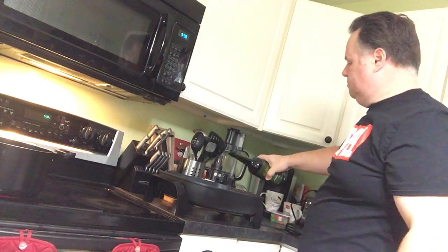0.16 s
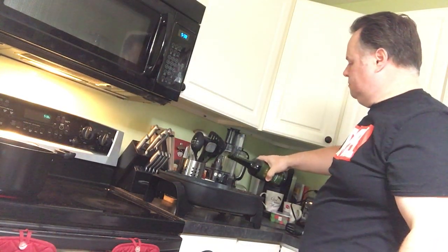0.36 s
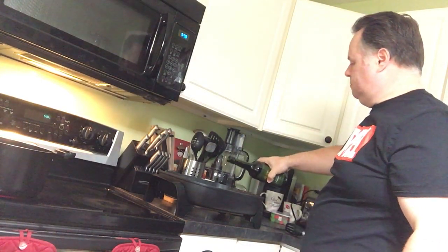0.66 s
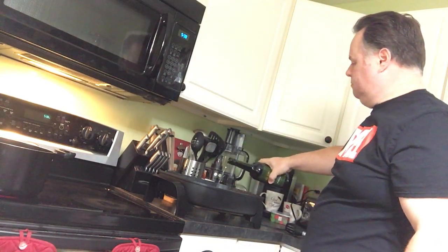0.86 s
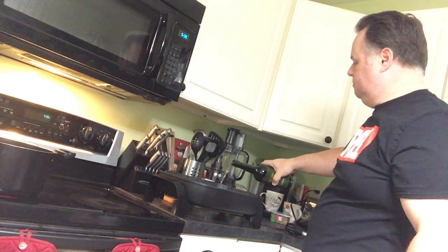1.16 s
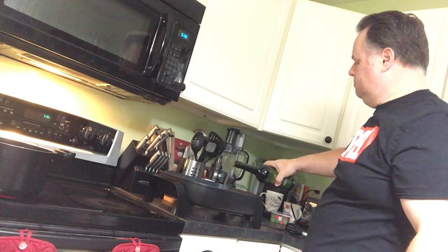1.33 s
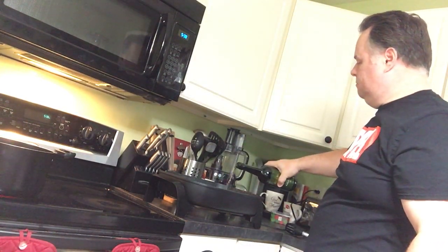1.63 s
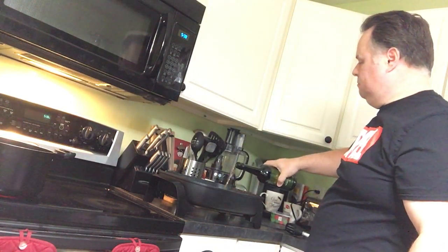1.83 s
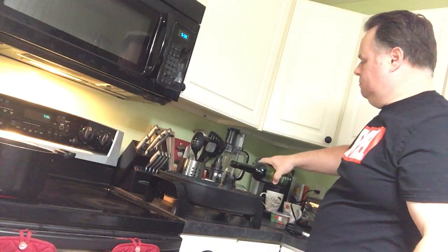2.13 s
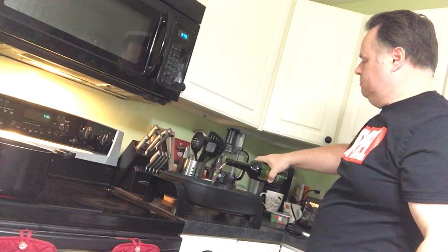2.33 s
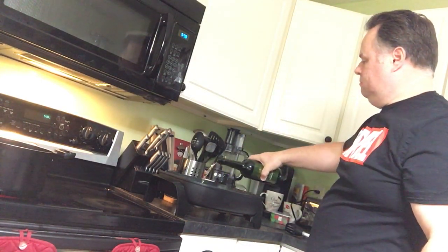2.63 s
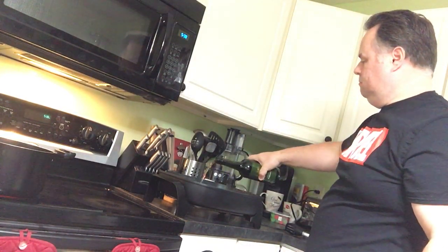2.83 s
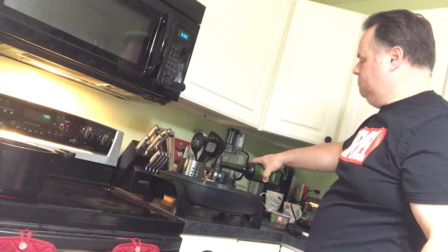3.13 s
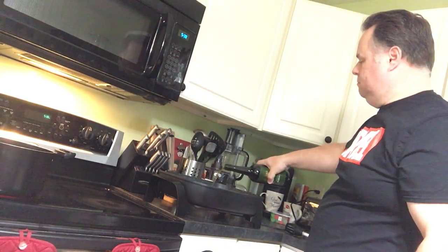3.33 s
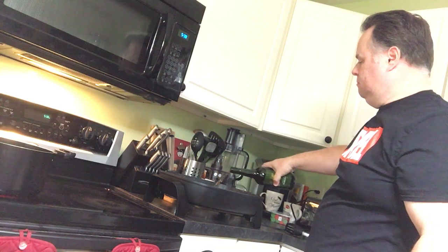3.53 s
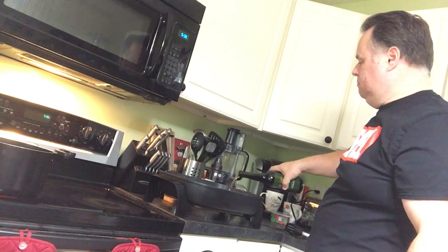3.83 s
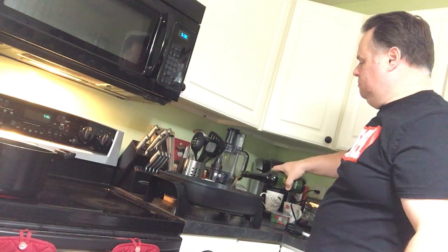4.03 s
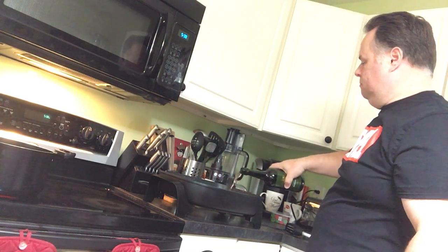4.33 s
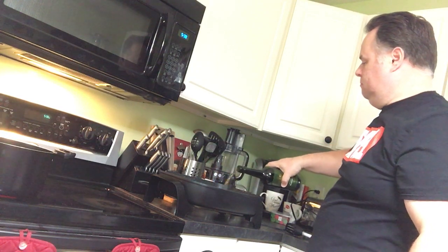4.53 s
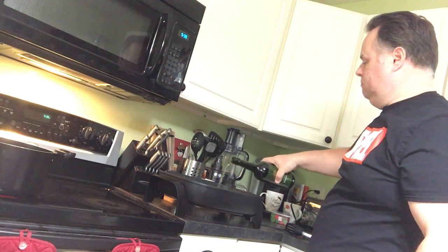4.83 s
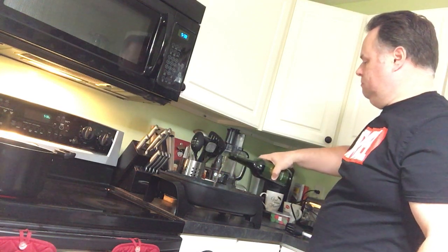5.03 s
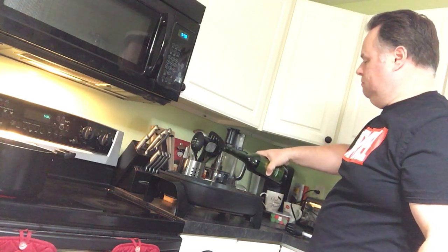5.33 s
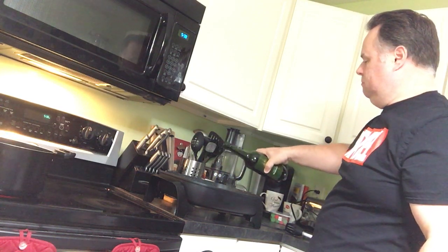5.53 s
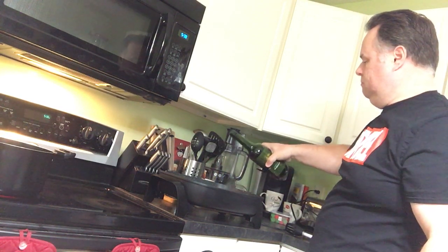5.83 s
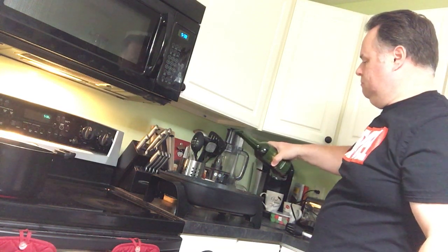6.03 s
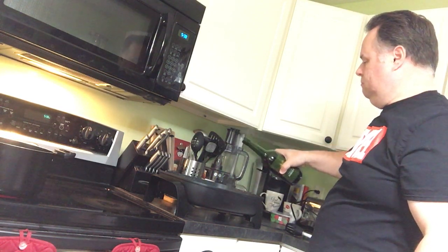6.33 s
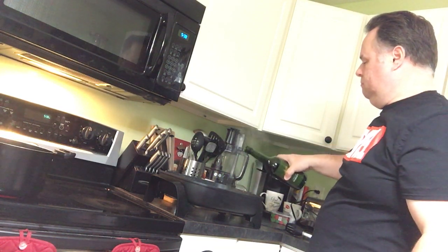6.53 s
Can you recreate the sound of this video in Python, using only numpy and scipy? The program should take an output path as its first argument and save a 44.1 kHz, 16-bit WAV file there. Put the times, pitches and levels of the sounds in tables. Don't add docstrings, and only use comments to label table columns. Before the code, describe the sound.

Close over a stove: faint fan rush first, with tiny ticks of drops on hot metal and hollow glassy gulps from a pouring bottle. Thin puddles burst in short pitched sprays, then merge into strong sizzling with bright fat spits. As the pool deepens the sizzle grows wetter and hollower, ringing in the iron, and continues unbroken. Small domestic kitchen, one nearby microphone.

```python
import sys
import numpy as np
from scipy import signal
from scipy.fft import rfft, irfft, next_fast_len
from scipy.io import wavfile

SR = 44100
rng = np.random.default_rng(int(sys.argv[2]) if len(sys.argv) > 2 else 0)


def ratio_of_db(decibels):
    return 10 ** (np.asarray(decibels, float) / 20)


def store_pcm(level_fs):
    pcm = np.round(np.clip(level_fs, -1, 1) * 32767).astype(np.int16)
    wavfile.write(sys.argv[1], SR, np.atleast_2d(pcm).T)


N = 294147


def rms_one(x):
    return x / np.sqrt(np.mean(x ** 2) + 1e-20)


def in_time(rows):
    start_s, *columns = np.transpose(rows)
    return [np.interp(np.arange(N) / SR, start_s, column) for column in columns]


def at_hz(points, hz):
    pitch_hz, level_db = np.transpose(points)
    return np.interp(np.log(hz), np.log(pitch_hz), level_db)


def drift(per_s):
    r = np.exp(-80 * np.pi * per_s / SR)
    noise = rng.standard_normal(N // 40 + 2002)
    slow = signal.lfilter([1], [1, -2 * r, r * r], noise)[2000:]
    return np.interp(np.arange(N) / 40, np.arange(len(slow)), rms_one(slow))


def ring(clicks, hz, t60_s):
    r = ratio_of_db(-60 / (t60_s * SR))
    w = 2 * np.pi * hz / SR
    return signal.lfilter([1, 0, -1], [1, -2 * r * np.cos(w), r * r], clicks + 1e-18)


def band(x, low_hz, high_hz, order=2):
    return signal.sosfilt(signal.butter(order, [low_hz, high_hz], "band", fs=SR, output="sos"), x)


def resonate(x, modes):
    hz, width_hz, level_db = np.transpose(modes)
    g = ratio_of_db(level_db / 2)
    c = -2 * np.cos(2 * np.pi * hz / SR)
    a = np.tan(np.pi * width_hz / SR)
    sos = np.transpose([1 + a * g, c, 1 - a * g, 1 + a / g, c, 1 - a / g]) / (1 + a / g)[:, None]
    return signal.sosfilt(np.ascontiguousarray(sos), x)


def bursts(rows, octaves, trim_db, rise=9.0):
    out = np.zeros(N + SR)
    t = np.arange(int(.1 * SR)) / SR
    shape = (len(rows), len(t))
    pops = rng.standard_normal(shape) * (rng.random(shape) < .3)
    for (start_s, level_db, hz, length_s), spray in zip(rows, pops):
        high_hz = min(hz * 2 ** octaves, .45 * SR)
        spray = rms_one(band(spray, hz / 2 ** octaves, high_hz, order=1))
        age = t / np.clip(length_s, .001, .04)
        envelope = (1 - np.exp(-rise * age)) * np.exp(-age)
        at = round((start_s - .001) * SR)
        out[at:at + len(t)] += ratio_of_db(level_db + trim_db) * envelope * spray
    return out[:N]


# start_s [s], level_db [dB peak], pitch_hz [Hz]
HOUSING_SHUDDERS = [
    (0.014, -58, 251),
    (0.064, -62, 232),
    (0.106, -51, 248.5),
    (0.161, -59, 277),
    (0.226, -60, 245),
    (0.294, -62, 299),
]


def shudders():
    t = np.arange(SR) / SR
    rocks = 0
    for start_s, level_db, hz in HOUSING_SHUDDERS:
        swell = 1 / np.cosh((t - start_s - .008) / 0.0092)
        rocks = rocks + ratio_of_db(level_db - 5) * np.sin(2 * np.pi * hz * t) * swell
    return np.pad(rocks, (0, N - SR))


# pitch_hz [Hz], level_db [dB per Hz]
FAN_AIR = [(15, -51), (25, -19.5), (86, -13), (144, -21), (165, -3.5), (247, -8), (291, 1), (324, -6.5),
           (472, -21), (526, -15.5), (635, -24), (788, -22.5), (1590, -26), (6110, -27.5), (15700, -42)]
HOUSING_HUM_DB = (-69.5, -63)


def fan():
    run_in = 8000
    white = rng.standard_normal((4, N + run_in))
    edges_hz = 22 * 2 ** np.arange(0, 9.7, 1 / 3)
    air = 0
    for k, (low_hz, high_hz) in enumerate(zip(edges_hz, edges_hz[1:])):
        hz = np.sqrt(low_hz * high_hz)
        hummed_db = -8.5 if 150 < hz < 330 else 0
        air = air + ratio_of_db(at_hz(FAN_AIR, hz) + hummed_db) * band(white[k % 2], low_hz, high_hz)
    air = resonate(air, [(385, 330, -5.0), (1680, 140, 4.5)])[run_in:]
    lower_db, upper_db = (db - 0.5 * drift(9.7) for db in HOUSING_HUM_DB)
    lower = rms_one(band(white[2], 171, 195)[run_in:])
    upper = rms_one(band(white[3], 222, 295)[run_in:])
    hum = ratio_of_db(lower_db - 3) * lower + ratio_of_db(upper_db - 4) * upper
    return shudders() + ratio_of_db(-61.5) * rms_one(air) + hum


def kitchen(x):
    size = next_fast_len(N + SR)
    hz = np.arange(size // 2 + 1) * SR / size
    t60_s = 1 / (1 + hz / 5000)
    walls = 0
    for k, lag_s in enumerate(np.geomspace(.0121, .0389, 10)):
        once = ratio_of_db(-60 * lag_s / t60_s) * np.exp(-2j * np.pi * hz * lag_s)
        walls = walls + (-1) ** k * once / (1 - once)
    return irfft(rfft(x, size) * walls, size)[:N]


def blip(rows, cycles, rise, trim_db):
    out = np.zeros(N)
    for start_s, level_db, hz in rows:
        half = int(15 * SR / hz)
        turns = np.arange(-half, half) * hz / SR
        at = round((start_s + 0.00256) * SR) - len(turns) // 2
        swell = 1 / np.cosh(turns / cycles)
        tone = np.sin(2 * np.pi * turns * (1 + rise * turns))
        out[at:at + len(turns)] += ratio_of_db(level_db + trim_db) * swell * tone
    return out


# start_s [s], level_db [dB peak], pitch_hz [Hz]
LIP_DROPS = [
    (0.3272, -54, 2670),
    (0.7243, -51, 2940),
]


def lip_drops():
    return blip(LIP_DROPS, cycles=7.3, rise=.001, trim_db=-8)


# start_s [s], level_db [dB peak], pitch_hz [Hz]
NECK_GLUGS = [
    (.331, -52.5, 1045),
    (.5345, -58, 1080),
    (.730, -59, 1060),
    (.924, -53.5, 1095),
    (1.129, -53, 1120),
    (1.343, -48, 1120),
]


def neck_glugs():
    return blip(NECK_GLUGS, cycles=1.45, rise=0.0051, trim_db=1.5)


def glass(neck):
    far_wall_s, far_wall_db = 0.0363, 1
    echoed = neck + ratio_of_db(far_wall_db) * np.roll(neck, round(far_wall_s * SR))
    main = ratio_of_db(-52.5) * ring(echoed, 1039, 0.45)
    lower = ratio_of_db(-56) * ring(neck, 995, 0.43)
    upper = ratio_of_db(-47) * ring(neck, 1105, 0.13)
    return main + lower + upper


# start_s [s], level_db [dB peak], pitch_hz [Hz], length_s [s]
LONE_SPITS = [
    (.030, -47, 7500, 0.012),
    (.42, -55, 3300, .012),
    (.44, -55, 1700, 0.035),
    (.459, -51, 10000, .004),
    (.620, -48, 4000, .007),
]


def lone_spits():
    return bursts(LONE_SPITS, octaves=0.18, trim_db=-9.0)


# start_s [s], level_db [dB peak]
FAT_SPITS = [(0.7978, -49), (0.8372, -49), (1.0343, -43), (1.1535, -43), (1.2164, -47), (1.3172, -44),
             (1.3601, -41), (1.4713, -46), (1.5501, -49), (1.603, -45), (1.8026, -45), (1.8694, -41),
             (1.9846, -40), (2.0625, -42), (2.1084, -41), (2.2525, -41), (2.3403, -41), (2.3832, -44),
             (2.4875, -43), (2.5254, -42), (2.6167, -34), (2.6541, -38), (2.7863, -37), (2.8272, -39),
             (2.8606, -37), (2.9679, -45), (3.0003, -41), (3.0527, -42), (3.1774, -41), (3.2238, -38),
             (3.2862, -32), (3.3969, -36), (3.4638, -35), (3.585, -37), (3.7436, -41), (4.0465, -38),
             (4.1562, -40), (4.46, -39), (4.5074, -38), (4.6032, -32), (4.8616, -40), (4.9908, -40),
             (5.0562, -43), (5.1789, -42), (5.2223, -44), (5.4538, -41), (5.6139, -42), (5.8334, -43),
             (5.9761, -41), (6.4729, -45), (6.5747, -41)]
# start_s [s], level_db [dB peak]
FAT_CRACKS = [
    (1.030, -40),
    (1.372, -40),
    (2.653, -31),
    (2.8605, -36),
    (3.46, -35),
    (3.598, -35),
    (4.862, -36),
    (5.456, -36),
]


def fat():
    small = [(start_s, level_db, 10500, 0.0091) for start_s, level_db in FAT_SPITS]
    big = [(start_s, level_db, 9500, .009) for start_s, level_db in FAT_CRACKS]
    return bursts(small, octaves=0.5, trim_db=-9.0, rise=4.6) + bursts(big, octaves=0.58, trim_db=-8)


# start_s [s], level_db [dB peak], pitch_hz [Hz]
FIRST_PUDDLES = [(0.788, -53.0, 4600), (0.794, -58, 5250), (0.802, -57, 5990), (0.854, -46.5, 2020),
                 (0.864, -47, 6930), (0.907, -45, 4010), (0.908, -45, 6030), (0.944, -46, 6120),
                 (0.946, -49, 3960), (0.955, -42, 2350), (0.962, -44, 2980), (0.988, -40, 2580),
                 (1.014, -40.5, 5210), (1.099, -45, 2000), (1.107, -46.0, 4310), (1.109, -39, 2840),
                 (1.135, -40.5, 2700), (1.151, -40.0, 2840), (1.172, -39, 2900), (1.185, -44.0, 3880),
                 (1.231, -34.5, 2800), (1.245, -41, 2540), (1.318, -38, 2150), (1.348, -34.5, 2240),
                 (1.385, -37.0, 2040), (1.405, -37, 2840), (1.409, -45, 4090), (1.425, -40, 2100),
                 (1.473, -36.0, 2110), (1.481, -41, 5240), (1.5, -37, 2290), (1.523, -35.5, 3920),
                 (1.537, -41.0, 3270), (1.602, -37, 2630), (1.637, -37.0, 2630), (1.731, -33.5, 1900),
                 (1.735, -39, 1450), (1.76, -38, 2250), (1.771, -41.0, 4480), (1.78, -42.0, 3660),
                 (1.806, -34, 1980), (1.816, -40.0, 4520), (1.83, -37, 2090), (1.852, -45, 2840),
                 (1.854, -41, 2200), (1.856, -43, 3880), (1.93, -39, 3880), (1.946, -40, 6800),
                 (2.019, -40.0, 3550), (2.037, -36, 2760), (2.111, -42, 6800), (2.113, -39, 3450),
                 (2.117, -40.0, 4180), (2.127, -41, 2450), (2.175, -41, 2220), (2.189, -37, 3660)]


def puddles():
    return bursts([(*row, 0.022) for row in FIRST_PUDDLES], octaves=0.083, trim_db=-7)


# start_s [s], level_db [dB peak], pitch_hz [Hz]
BUBBLE_SWARMS = [(2.253, -19.5, 4200), (2.331, -27.1, 2650), (2.444, -18.5, 3080), (2.47, -21, 2080),
                 (2.616, -22, 2100), (2.686, -22, 3450), (2.782, -25.7, 2840), (2.939, -26.2, 1600),
                 (3.031, -27, 2410), (3.105, -19, 2670), (3.326, -22, 3080), (3.39, -24, 1480),
                 (3.532, -21, 2760), (3.763, -26, 1200), (3.841, -24, 2150), (3.901, -20, 2780),
                 (3.969, -19, 2070), (4.057, -21, 1920), (4.145, -24, 1750), (4.178, -23, 2510),
                 (4.352, -20, 3880), (4.352, -25.2, 4440), (4.37, -20, 2150), (4.412, -25, 1550),
                 (4.602, -16, 3660), (4.609, -30, 2780), (4.615, -21, 2170), (4.677, -20, 2150),
                 (4.683, -20, 3960), (4.731, -21, 1630), (4.735, -29, 2670), (4.757, -23, 3490),
                 (4.939, -18, 1810), (4.995, -21, 2530), (5.11, -20, 2130), (5.22, -19, 1800),
                 (5.37, -25.6, 2500), (5.376, -29, 3450), (5.432, -23, 2100), (5.519, -25.8, 4010),
                 (5.545, -24.7, 2190), (5.613, -25.3, 2780), (5.613, -25, 1730), (5.615, -21, 3860),
                 (5.667, -20, 1720), (5.729, -27, 1680), (5.954, -24.1, 2020), (6.0, -23.5, 1100),
                 (6.084, -20, 2700), (6.104, -23, 2190), (6.162, -20, 2770), (6.172, -17.6, 1680),
                 (6.238, -21, 2000), (6.312, -22, 3360), (6.324, -24, 1790), (6.393, -20, 3660),
                 (6.415, -28, 1150), (6.577, -23, 1420), (6.615, -26, 1680), (6.635, -24, 2410)]


def swarms():
    return bursts([(*row, 0.022) for row in BUBBLE_SWARMS], octaves=0.051, trim_db=-19.5)


# pitch_hz [Hz], level_db [dB per Hz]
SIZZLE_SPECTRUM = [(210, -48), (350, -16.5), (497, -12), (728, -15), (827, -18.5), (924, -14), (1030, -8),
                   (1170, -8), (1290, -12), (1400, -2.5), (1560, 2), (1720, -1), (4060, 1), (12600, -28),
                   (15700, -52)]


def bubbles(low_hz, high_hz, per_s, cycles, spread_db, flicker_db, together, common_hz, count=10):
    sizes = ratio_of_db(spread_db * np.minimum(rng.exponential(1, N), 5)) * rng.choice([-1, 1], N)
    born = sizes * (rng.random(N) < per_s / SR)
    dealt = rng.integers(0, count, N)
    own = [drift(9.7), drift(3.1), drift(13)]
    edges_hz = np.geomspace(low_hz, high_hz, 2 * count + 1)
    out = 0
    for k, hz in enumerate(edges_hz[1::2]):
        grains = rms_one(ring(born * (dealt == k), hz, cycles / hz))
        turn = np.pi * k / count
        flicker = 0.69 * together + np.cos(turn) * own[0] + np.sin(turn) * own[1]
        flicker = flicker + 0.12 * np.cos(2 * turn) * own[2]
        favoured_db = 3.4 * np.exp(-(np.log2(hz / common_hz) / 0.76) ** 2)
        level_db = at_hz(SIZZLE_SPECTRUM, hz) + flicker_db * flicker + favoured_db
        out = out + grains * np.sqrt(hz) * ratio_of_db(level_db)
    return rms_one(band(out, 0.89 * low_hz, min(1.46 * high_hz, .45 * SR)))


# start_s [s], vigour_db [dB], bubble_size [0-1], spatter_db [dB]
BOIL_COURSE = [(.75, -74.5, .3, -8), (.8, -63, 0.34, 11), (.97, -54.5, 0, -3.5), (1.12, -51.5, 0, -1.5),
               (1.35, -48, 0.25, -4.5), (1.75, -45, 0.4, 0), (1.95, -45.5, 0.22, 0), (2.3, -42.5, 0.2, 0),
               (2.47, -41, 0.52, -0.5), (2.75, -41, 0.4, 1), (3.4, -41, 0.85, 5), (3.75, -39.5, 0.94, 2.5),
               (4.1, -40, 0.86, 5.5), (4.65, -37, 0.38, -4), (5.05, -39.5, 0.65, -1.5),
               (5.65, -39.5, 0.89, 0.5), (6.15, -40.5, 0.99, 1.5), (6.67, -39.5, 0.9, -1)]
# low_hz [Hz], high_hz [Hz], bursts_per_s [1/s], ring_cycles [cycles],
# size_spread_db [dB], flicker_db [dB]
BUBBLE_FAMILIES = [(343, 1483, 5500, 7.6, 2.0, 0.3), (1540, 4260, 11000, 6.5, 1.6, 0.33),
                   (4440, 8700, 18000, 5.7, 2.4, 0.5), (9430, 12000, 16000, 4.1, 3.6, 0.75)]
# level_db [dB at mean vigour], vigour_share [ratio], size_db [dB, smallest to largest],
# spatter_share [ratio]
FAMILY_ANSWERS = [(-54, 0.92, 3.5, 0.11), (-42.5, 0.97, 0.78, 0.01), (-43.5, 0.91, -6.5, 0.65),
                  (-55.5, 0.41, -1, 0.7)]


def boil():
    landed = np.clip((np.arange(N) / SR - BOIL_COURSE[0][0]) / 0.03, 0, 1)
    together = 0.55 * drift(9.7) + 2.0 * drift(26)
    vigour_db, size, spatter_db = in_time(BOIL_COURSE)
    small_hz, large_hz, mean_vigour_db = 2900, 1920, -42
    common_hz = small_hz * (large_hz / small_hz) ** size
    out = 0
    for family, (db, swing, size_db, share) in zip(BUBBLE_FAMILIES, FAMILY_ANSWERS):
        level_db = db + swing * (vigour_db - mean_vigour_db) + size_db * size + share * spatter_db
        out = out + ratio_of_db(level_db) * bubbles(*family, together, common_hz)
    return landed * out


# pitch_hz [Hz], t60_s [s], level_db [dB]
HOLLOW_MODES = [(1746, 0.028, 1), (2200, 0.027, -8.5)]
# start_s [s], level_db [dB]
HOLLOW_SONG = [
    (1.8, -37),
    (3.4, -17),
    (3.9, 2),
    (4.3, -2),
    (4.7, -3),
    (5.2, -8),
    (5.7, -4),
    (6.1, 2),
    (6.67, -1),
]


def pool(sizzle):
    sung = 0
    for hz, t60_s, level_db in HOLLOW_MODES:
        peak_gain = (1 - ratio_of_db(-120 / (t60_s * SR))) / 2
        sung = sung + ratio_of_db(level_db) * ring(sizzle, hz, t60_s) * peak_gain
    return sizzle + ratio_of_db(in_time(HOLLOW_SONG)[0]) * sung


# pitch_hz [Hz], width_hz [Hz], level_db [dB]
PAN_MODES = [(508, 13, -1), (508, 50, -6), (604, 39, 5.5), (630, 25, -2.5), (725, 13, 5.5),
             (750.4, 16, 8.5), (793, 14, 9), (826, 35, -6), (846, 12, 5.5), (880, 18, 9), (926, 16, 8.5),
             (963, 15, 6), (1012, 11, 3), (1060, 12, -1), (1101, 21, 8), (1160, 16, 2), (1216, 13, 2),
             (1203.4, 17, 7.5), (1286, 18, -5), (1320, 22, -2), (1400, 65, 6), (1434, 20, 0.5),
             (1460, 15, -5.5), (1596, 18, -3), (1670, 33, 5.5), (1800, 16, -2), (2013, 18, 6),
             (2123, 24, 5), (2180, 16, 2), (2207, 20, -7.5), (2130, 16, 3.5), (2372, 21, 5), (2350, 20, 0),
             (3030, 61, 1), (4440, 40, 1.5), (2690, 23, 4.5), (3530, 21, 1.5)]


def skillet():
    sizzle = pool(boil() + fat() + puddles() + swarms() + lone_spits())
    sizzle = sizzle + ratio_of_db(-30) * kitchen(sizzle)
    return resonate(sizzle, PAN_MODES)


def scene():
    neck, drops = neck_glugs(), lip_drops()
    tails = ratio_of_db(-18) * kitchen(neck + drops)
    return np.tile(fan() + tails + drops + neck + glass(neck) + skillet(), (2, 1))


# pitch_hz [Hz], width_hz [Hz], level_db [dB]
MICROPHONE_MODES = [(4810, 290, -4.5), (7650, 540, -1.5), (8740, 160, 4.5), (9560, 200, 5),
                    (10370, 1160, -5), (15400, 1100, 2)]


def microphone(x):
    x = band(resonate(x, MICROPHONE_MODES), 38, 20000, order=3)
    return signal.sosfilt(signal.ellip(12, .5, 70, 15730, fs=SR, output="sos"), x)


# start_s [s], low_hz [Hz], high_hz [Hz]
TREBLE_SLIPS = [(.252, 9600, 11000), (.577, 5700, 6900), (2.11, 8900, 10300), (2.11, 14400, 15700),
                (3.665, 13100, 14400), (3.782, 6900, 9000), (3.99, 5600, 6900), (3.99, 7600, 9000),
                (3.99, 9600, 11000), (3.99, 14400, 15700), (4.826, 6200, 8300), (4.826, 14400, 15700),
                (5.221, 5100, 6300), (5.361, 13800, 15100), (6.104, 5600, 7600), (6.359, 5100, 6300)]


def treble_slips(mono):
    t = np.arange(N) / SR
    other = np.roll(mono, 3000)
    apart = 0
    for start_s, low_hz, high_hz in TREBLE_SLIPS:
        swell = np.sin(np.pi * np.clip((t - start_s) / .044, 0, 1)) ** 2
        apart = apart + swell * band(other, low_hz, high_hz, order=4)
    return ratio_of_db(-3.5) * apart * [[1], [-1]]


def top_cut(x):
    return signal.sosfilt(signal.butter(12, 16220, fs=SR, output="sos"), x)


def record(dry):
    mono = microphone(dry[0])
    return top_cut(mono + treble_slips(mono))


dry = scene()
out = record(dry)
store_pcm(out)
```